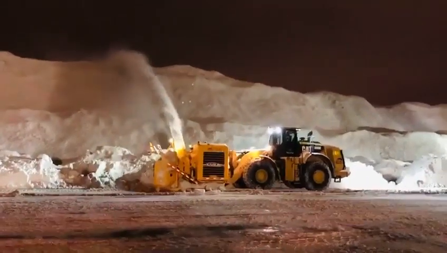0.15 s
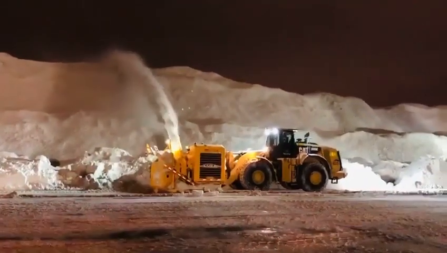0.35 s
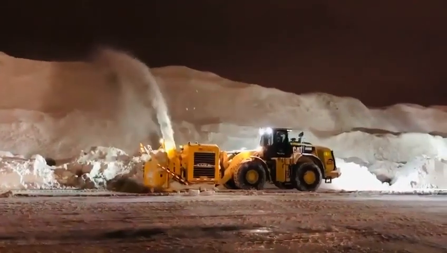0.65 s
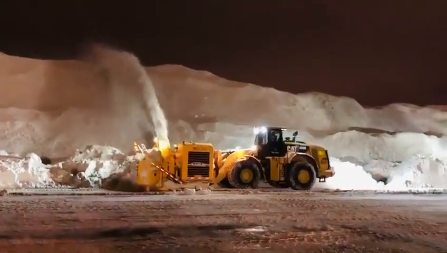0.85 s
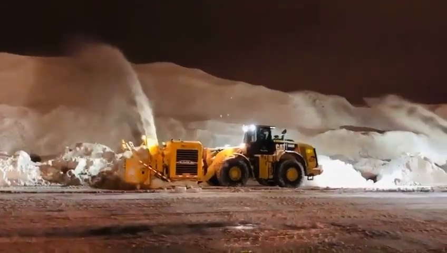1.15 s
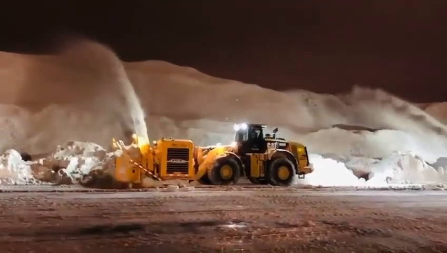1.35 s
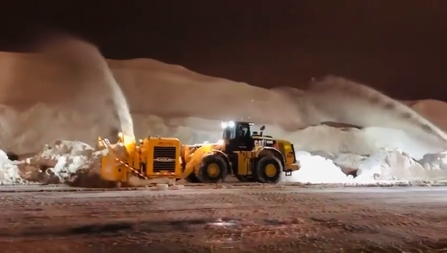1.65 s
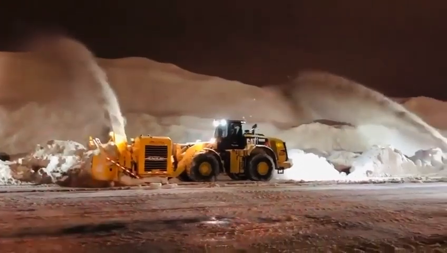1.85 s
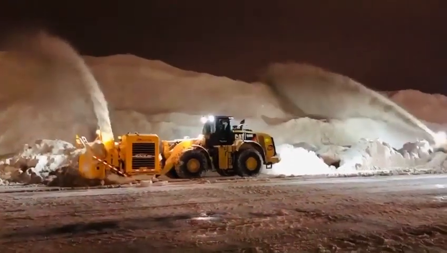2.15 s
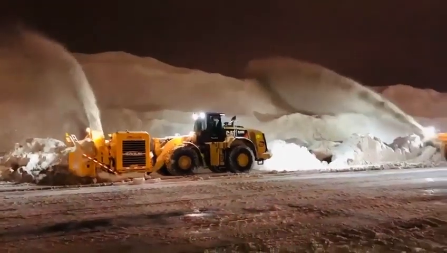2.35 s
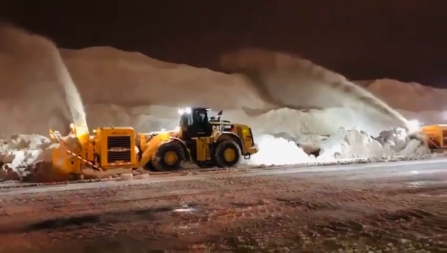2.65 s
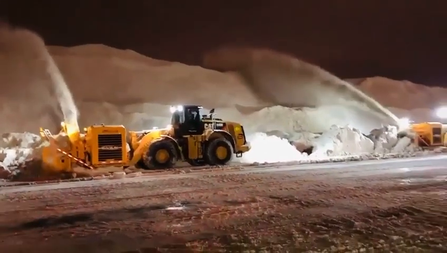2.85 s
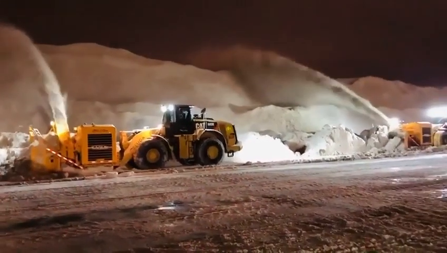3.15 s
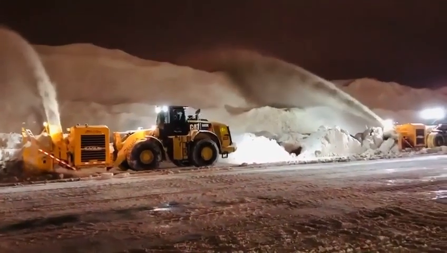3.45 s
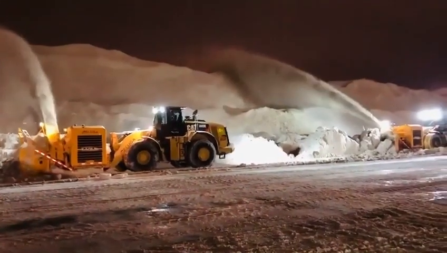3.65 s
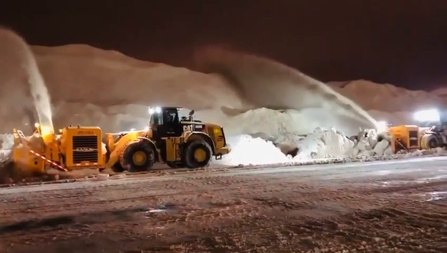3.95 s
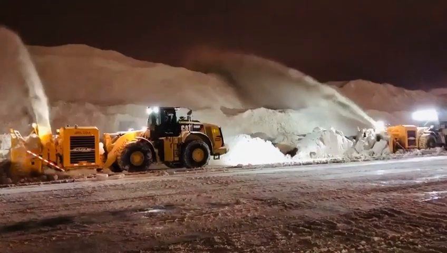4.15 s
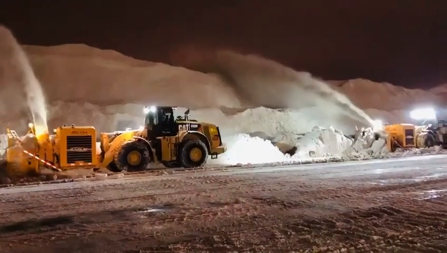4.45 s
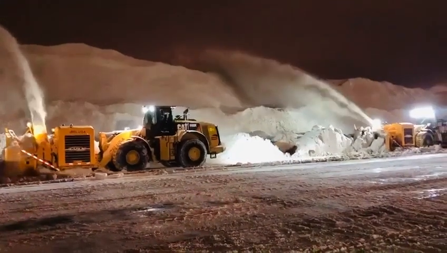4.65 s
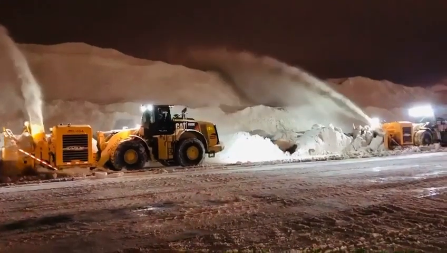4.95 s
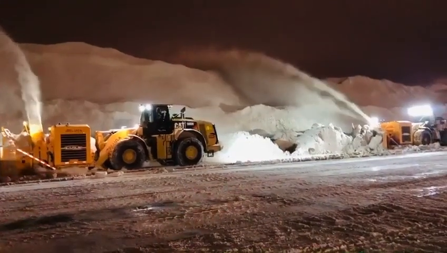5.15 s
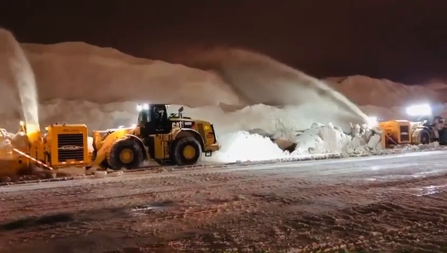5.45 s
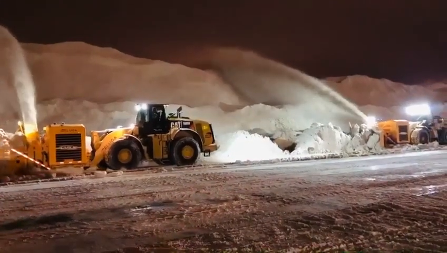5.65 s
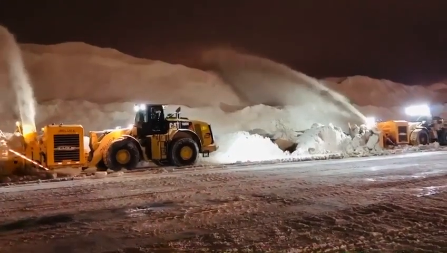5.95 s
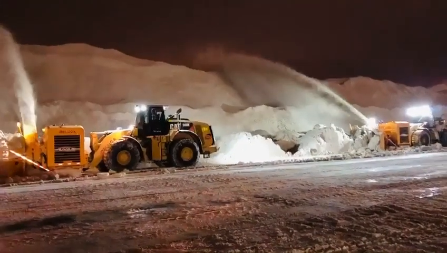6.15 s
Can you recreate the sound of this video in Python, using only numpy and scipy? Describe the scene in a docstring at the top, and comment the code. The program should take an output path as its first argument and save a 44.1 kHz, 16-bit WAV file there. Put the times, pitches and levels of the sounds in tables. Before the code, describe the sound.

From 0 seconds the sound is already full and dense: a near loader-mounted snow blower runs hard outdoors, its diesel giving a deep buzzing drone with turbulent exhaust rumble, beneath a broad, slightly pulsing impeller roar. Ice keeps steel parts faintly ringing, and snow hisses from the chute with fine gritty ticks. Farther off, a second blower sounds a little higher, its note sagging and recovering around 0.4, 2.1, 3.4 and 5.2 seconds, with a soft distant snow wash. The near engine holds nearly steady until about 1.5, then bogs down, sliding clearly lower from 3 to 5.7 while roar and spray grow duller and weaker. Around 5.05 to 5.25 a hard lump passes through in a quick cluster of dull thuds. After 5.6 the near engine's fundamental drops away quickly; the far drone and rising low wind or handling rumble remain more noticeable until about 6.3. Mono, single microphone.

```python
"""Snow blower bogging down

A loader-mounted snow blower chews into a snow bank and its diesel slowly bogs down; a second one hunts farther off.
Engine lines are cosines locked to firing phase; exhaust gas, impeller roar, snow spray, the far jet and a low wind
or handling rumble are shaped noise. Ice rings steel modes, and one hard lump thuds through the impeller as
overlapping noise bursts. Mono.
"""
import sys
import numpy as np
from scipy import signal
from scipy.fft import rfft, irfft
from scipy.io import wavfile
from scipy.ndimage import uniform_filter1d

SR = 44100
rng = np.random.default_rng(int(sys.argv[2]) if len(sys.argv) > 2 else 0)


def store_pcm(level_fs):
    """Save levels as 16-bit WAV."""
    pcm = np.round(np.clip(level_fs, -1, 1) * 32767).astype(np.int16)
    wavfile.write(sys.argv[1], SR, np.atleast_2d(pcm).T)


N = 278260
TIME = np.arange(N) / SR  # s
FULL_SPEED_HZ = 173  # near firing rate taken as full speed

# near engine stops labouring: (time [s], firing tone loss [dB/s], exhaust rumble loss [dB/s])
EASE = (5.62, 45, 8)


def gain_of(db):
    """Amplitude factor of a level in dB."""
    return 10 ** (np.asarray(db) / 20)


def evened(x):
    """Scales a signal to rms 1."""
    return x / np.sqrt(np.mean(x ** 2) + 1e-20)


def curves(rows):
    """Each column of a table of (time [s], values..) at every sample."""
    time_s, *columns = np.transpose(rows)
    return [np.interp(TIME, time_s, column) for column in columns]


def bump(centre_s, height, half_s):
    """Gaussian rise and fall around a moment."""
    return height * np.exp(-((TIME - centre_s) / half_s) ** 2)


def coloured(x, points):
    """Filters x by (frequency [Hz], level [dB]) points on a log frequency axis, to rms 1."""
    hz, db = np.transpose(points)
    bins_hz = np.fft.rfftfreq(N, 1 / SR)
    response = gain_of(np.interp(np.log(bins_hz + 1), np.log(hz), db))
    return evened(irfft(rfft(x) * response, N))


def wander(rate_hz):
    """Random drift at rms 1: noise under a Gaussian low-pass."""
    bins_hz = np.fft.rfftfreq(N, 1 / SR)
    lowpass = np.exp(-(bins_hz / rate_hz) ** 2)
    return evened(irfft(rfft(rng.standard_normal(N)) * lowpass, N))


def patchy(x, patch_db, wide_hz, long_s):
    """Patches of the noise's spectrum vary at random in level; rms 1."""
    size, hop = 1024, 256
    z = signal.stft(x, nperseg=size, noverlap=size - hop)[2]
    bins_wide = max(1, round(wide_hz * size / SR))
    frames_long = max(1, round(long_s * SR / hop))
    field = uniform_filter1d(rng.standard_normal(z.shape), bins_wide, axis=0)
    field = evened(uniform_filter1d(field, frames_long, axis=1))
    patched = signal.istft(z * gain_of(patch_db * field), nperseg=size, noverlap=size - hop)[1]
    return evened(patched[:N])


def crank(firing_hz, jitter):
    """Firing phase in radians; the shaft never turns quite evenly (jitter: rms fraction of speed)."""
    return 2 * np.pi * np.cumsum(firing_hz * (1 + jitter * wander(12.9))) / SR


def tone(phase, db, flutter_db):
    """One engine line, fluttering as the air between carries it."""
    level_db = db + flutter_db * wander(7)
    return np.sqrt(2) * gain_of(level_db) * np.cos(phase + 2 * np.pi * rng.random())


def slowing(firing_hz):
    """Octaves by which the near engine has dropped below full speed."""
    return np.log2(FULL_SPEED_HZ / firing_hz)


def layer_db(firing_hz, law):
    """Level of a near layer: it shifts as the engine slows and falls as the machine moves off."""
    full_db, loss_db_per_octave, loss_db_per_s = law
    return full_db - loss_db_per_octave * slowing(firing_hz) - loss_db_per_s * TIME


def eased_db(loss_db_per_s):
    """Loss of level once the load comes off."""
    return loss_db_per_s * np.maximum(TIME - EASE[0], 0)


def pipe_db(hz):
    """Lift by the exhaust pipe's resonances, which the harmonics slide through."""
    # (centre [Hz], half width [Hz], lift [dB])
    resonances = [(132, 4, 2), (146.5, 5, 5), (163, 7, 2.6), (304, 4, 5), (331, 10, 7.5)]
    return sum(db * np.exp(-((hz - centre_hz) / width_hz) ** 2) for centre_hz, width_hz, db in resonances)


def note_levels(firing_hz):
    """Exhaust harmonics follow speed and pipe resonances; the lowest fades as the load eases."""
    # harmonics 1-3: (level at full speed before pipe lift [dB], loss per octave of slowing [dB])
    harmonics = [(-22.4, -5), (-35, 14), (-38.5, 22)]
    octaves = slowing(firing_hz)
    first, *upper = [db - loss_db * octaves + pipe_db(k * firing_hz)
                     for k, (db, loss_db) in enumerate(harmonics, 1)]
    return [first - eased_db(EASE[1]), *upper]


def near_diesel(phase, levels):
    """Exhaust note with its harmonics, plus weaker lines, those between them from unequal cylinders."""
    # (multiple of firing rate, level [dB])
    weak_orders = [(4 / 3, -40), (5 / 3, -39), (4, -44), (5, -42), (6, -43), (8, -46), (11, -48)]
    note = sum(tone(k * phase, db, flutter_db=0.7) for k, db in enumerate(levels, 1))
    return note + sum(tone(k * phase, db, flutter_db=2.0) for k, db in weak_orders)


def far_diesel():
    """Second machine: snow bites sag its speed, its governor recovers; note and geared parts follow."""
    # (time [s], sag of firing rate [Hz], half length [s])
    bites = [(0.432, 12.1, 0.63), (2.089, 7.27, 0.35), (3.438, 8.01, 0.46), (5.15, 12.7, 0.45)]
    # firing tone, geared hum, geared whine: multiples of firing rate
    multiples = (1, 1.232, 3.685)
    # the same three: (level running free before growth [dB], gain per Hz of sag [dB])
    strong_lines = [(-30.5, 0.14), (-39.5, 0.19), (-42, 0.24)]
    # one swell of the geared hum: (time [s], height [dB], half length [s])
    hum_swell = (4.15, 7, 0.46)
    # weaker lines: (multiple of firing rate, level before growth [dB])
    weak_orders = [(1 / 3, -41), (1 / 2, -33), (3 / 2, -41), (2, -46), (5 / 2, -47), (7 / 2, -51)]
    free_hz, growth_db_per_s = 196.7, 0.5

    sag_hz = sum(bump(*bite) for bite in bites)
    note_db, hum_db, whine_db = [db + db_per_hz * sag_hz for db, db_per_hz in strong_lines]
    levels = note_db, hum_db + bump(*hum_swell), whine_db
    phase = crank(free_hz - sag_hz, jitter=0.0024)
    strong = sum(tone(k * phase, db, flutter_db=2.0) for k, db in zip(multiples, levels))
    weak = sum(tone(k * phase, db, flutter_db=2.0) for k, db in weak_orders)
    # grows as the microphone turns towards it
    return gain_of(growth_db_per_s * TIME) * (strong + weak)


def exhaust(firing_hz, rumble_db, drone_db, steadiness=0.082, follow=0.22):
    """Turbulent gas: a deep rumble, and a drone that sinks as the engine slows."""
    # relative spectra: (frequency [Hz], density [dB per Hz])
    rumble_spectrum = [(15, -38), (30, -28.5), (42, -23.5), (55, -15), (70, -9), (92, 0), (120, -1.5),
                       (142, 5), (165, -6), (200, -11.5), (260, -18.5), (500, -60.5)]
    drone_spectrum = [(120, -30), (190, -9.5), (235, -2.5), (275, 1.5), (315, -8), (365, -3), (405, -13.5),
                      (480, -28), (900, -60)]

    rumble = coloured(rng.standard_normal(N), rumble_spectrum)
    # steady gas flow: long swells are partly levelled, quick throbs stay
    power = uniform_filter1d(rumble ** 2, size=6000)
    rumble = evened(rumble / (abs(power) + 0.05) ** steadiness)
    # reading the drone more slowly lowers its pitch
    pace = (firing_hz / firing_hz.max()) ** follow
    drone = np.interp(np.cumsum(pace), np.arange(N), coloured(rng.standard_normal(N), drone_spectrum))
    return gain_of(rumble_db + 3.5) * rumble + gain_of(drone_db + 0.04) * drone


def low_rumble():
    """Low wind or handling rumble: deep shaped noise, rising towards the end."""
    # relative spectrum: (frequency [Hz], density [dB per Hz])
    low_spectrum = [(15, -24), (35, -14), (55, -1), (70, -0.5), (110, -26), (250, -62.5)]
    # (time [s], level [dB])
    low_levels = [(0, -44), (4.6, -46), (5.2, -39.5), (6.3, -34)]
    return gain_of(curves(low_levels)[0]) * coloured(rng.standard_normal(N), low_spectrum)


def impeller(phase, roar_db, pulsing=0.12, churn_db=0.27):
    """Broad roar of fan and impeller, pulsing with the engine and churning with the feed."""
    # relative spectrum: (frequency [Hz], density [dB per Hz])
    roar_spectrum = [(200, -16), (410, -7.5), (490, -4.5), (560, -4.5), (700, -2), (760, -2.5), (860, 0),
                     (1200, -2.5), (1550, -3.5), (1950, -9), (2200, -12), (2500, -18.5), (4500, -30),
                     (10000, -53)]
    flow = rng.standard_normal(N) * (1 + pulsing * np.cos(phase)) * gain_of(churn_db * wander(19))
    flow = patchy(flow, patch_db=1.28, wide_hz=170, long_s=0.07)
    return gain_of(roar_db - 0.53) * coloured(flow, roar_spectrum)


def steel(roar_db, hits_per_s=45):
    """Ice chunks strike at random and keep decaying modes of drum and chute ringing inside the roar."""
    # (frequency [Hz], relative level [dB], t60 [s])
    modes = [(688, -2.5, 0.13), (826, 1, 0.13), (870, 0, 0.26), (943, 0, .25), (1136, -5, 0.14),
             (1383, 0.5, 0.17), (1510, 0, .15), (1603, -2.5, 0.12), (2048, -8.5, 0.089),
             (3370, -13.5, 0.089)]
    age_s, out = TIME[:SR // 2], np.zeros(N)
    for hz, db, t60_s in modes:
        hits = rng.standard_normal(N) * (rng.random(N) < hits_per_s / SR)
        ring = np.sin(2 * np.pi * hz * age_s) * np.exp(-np.log(1000) * age_s / t60_s)
        out += gain_of(db) * evened(signal.oaconvolve(hits, ring)[:N])
    return gain_of(roar_db - 8.5) * evened(out)


def spray(spray_db, gust_db=0.3, grains_per_s=900, grit=0.3):
    """Snow hisses out of the chute as noise, with sparse ice grit ticking along the steel."""
    # relative spectrum: (frequency [Hz], density [dB per Hz])
    spray_spectrum = [(1500, -26), (2600, -13), (2980, -4), (3180, 0), (3550, -1), (3900, -2), (4500, -6.5),
                      (5200, -10.5), (6000, -11), (6700, -9.5), (8000, -15.5), (9300, -22.5)]
    ticks = rng.standard_normal(N) * (rng.random(N) < grains_per_s / SR)
    stream = rng.standard_normal(N) + grit * evened(ticks)
    stream = stream * gain_of(gust_db * wander(11))
    stream = patchy(stream, patch_db=2.5, wide_hz=170, long_s=0.028)
    return gain_of(spray_db - 0.48) * coloured(stream, spray_spectrum)


def far_rush(db=-38):
    """The second blower's jet: a smooth, distant wash of noise."""
    spectrum = [(200, -11.5), (900, -8.5), (2300, 0.5), (2900, -4.5), (5000, -19), (9000, -33.5)]
    return gain_of(db) * coloured(rng.standard_normal(N), spectrum)


def lump_thud(rise_s=0.0027):
    """One hard lump thuds through the impeller; overlapping noise bursts form its onset, body and tail."""
    # (time [s], level before 2 dB trim and envelope [dB], spectral peak [Hz], t60 [s])
    bursts = [(5.058, -24.5, 290, 0.12), (5.087, -20, 424, 0.16), (5.115, -27, 483, 0.37),
              (5.205, -21, 930, .05)]
    out = np.zeros(N)
    for start_s, db, hz, t60_s in bursts:
        age_s = np.maximum(TIME - start_s, 0)
        spectrum = [(hz / 4, -40), (hz / 1.2, -6), (hz, 0), (hz * 1.4, -7), (hz * 6, -40)]
        noise = coloured(rng.standard_normal(N), spectrum)
        envelope = (1 - np.exp(-age_s / rise_s)) * np.exp(-np.log(1000) * age_s / t60_s)
        out += gain_of(db + 2.0) * noise * envelope
    return out


def scene():
    """Both machines and their snow; the near engine's speed drives its exhaust, impeller, steel and spray."""
    # near diesel bogging down: (time [s], firing rate [Hz])
    near_speed = [(0.0, 173.4), (0.35, 171.3), (1.5, 171), (2.1, 167.1), (3.0, 163.7), (4.1, 153.9),
                  (4.7, 144.3), (5.2, 136.4), (5.7, 129.8), (6.3, 130.2)]
    # near layers: (full-speed level before layer trim [dB], loss per octave of slowing [dB], loss [dB/s])
    rumble_law = (-22.6, -4, .33)
    drone_law = (-24.3, 10, .05)
    roar_law = (-21, 4.2, 0.34)
    spray_law = (-32, 7.9, 0.42)

    firing_hz, = curves(near_speed)
    rumble_db = layer_db(firing_hz, rumble_law) - eased_db(EASE[2])
    drone_db = layer_db(firing_hz, drone_law)
    roar_db = layer_db(firing_hz, roar_law)
    spray_db = layer_db(firing_hz, spray_law)
    phase = crank(firing_hz, jitter=0.002)
    engines = near_diesel(phase, note_levels(firing_hz)) + far_diesel()
    gas = exhaust(firing_hz, rumble_db, drone_db)
    snow = impeller(phase, roar_db) + steel(roar_db) + spray(spray_db) + far_rush() + lump_thud()
    return (engines + gas + low_rumble() + snow)[None]


def record(dry):
    """The recorder rounds off the tallest peaks by tanh, then low-passes."""
    knee, headroom, edge_hz = 0.5, 0.22, 9200
    over = np.maximum(abs(dry) - knee, 0)
    rounded = dry - np.sign(dry) * (over - headroom * np.tanh(over / headroom))
    lowpass = signal.firwin(511, edge_hz, window=("kaiser", 9), fs=SR)
    return signal.oaconvolve(rounded, lowpass[None], "same")


dry = scene()
out = record(dry)
store_pcm(out)
```